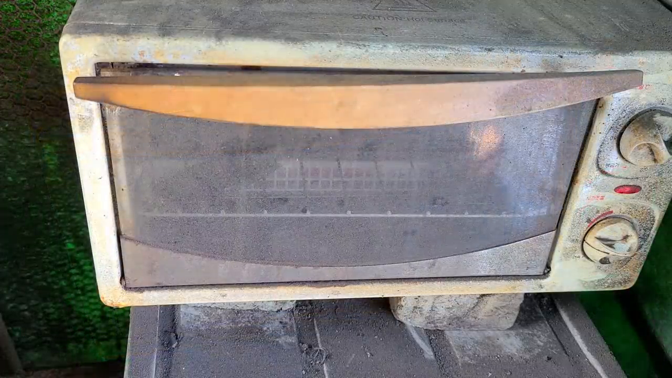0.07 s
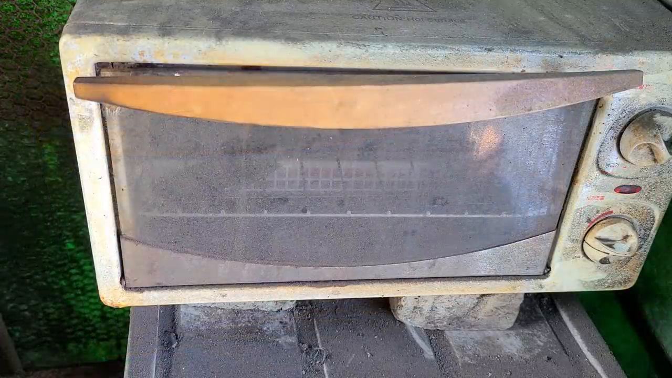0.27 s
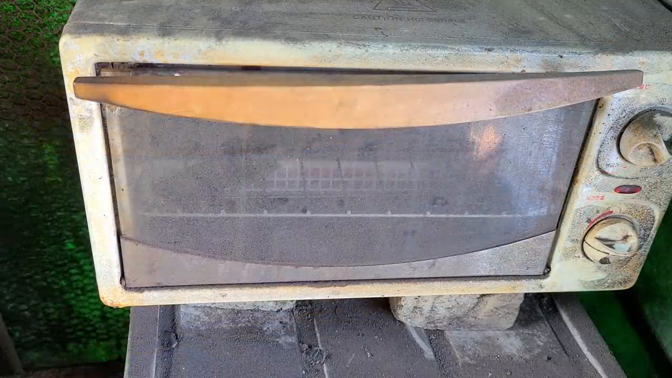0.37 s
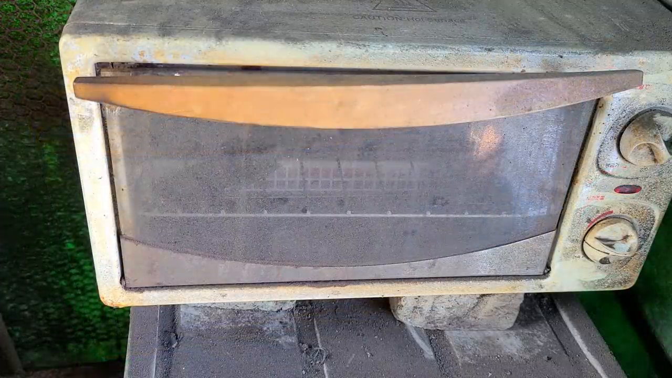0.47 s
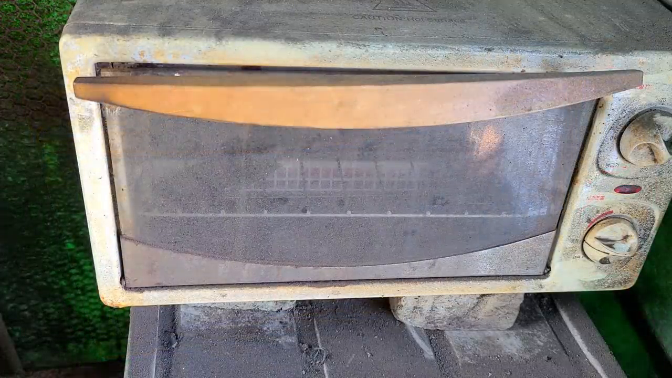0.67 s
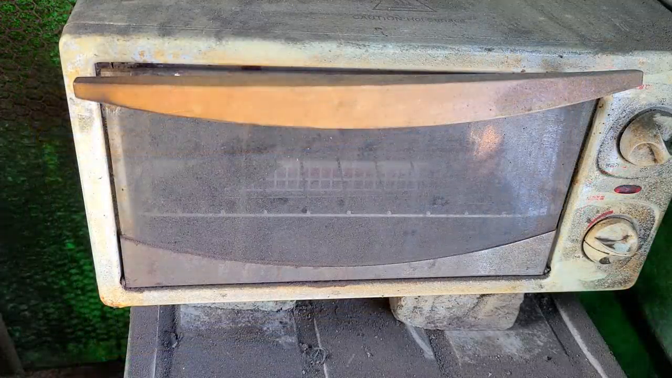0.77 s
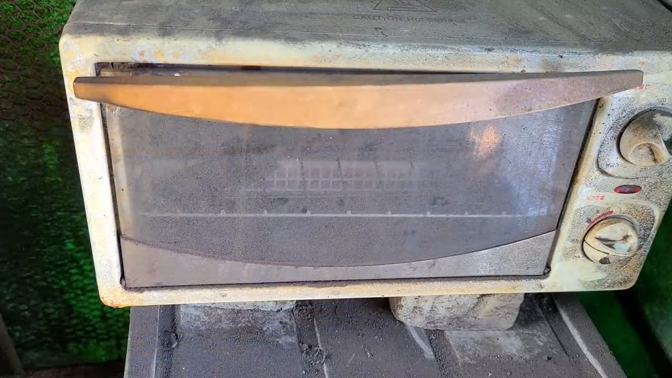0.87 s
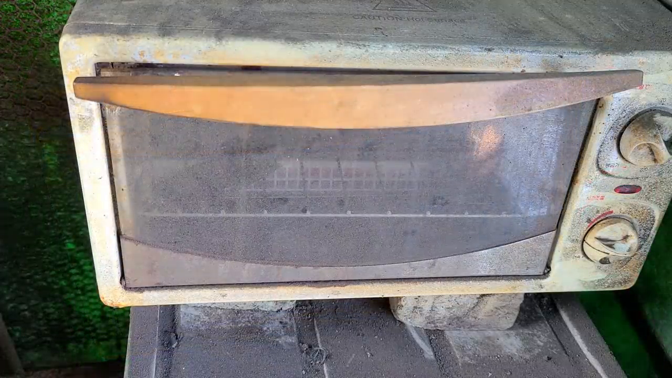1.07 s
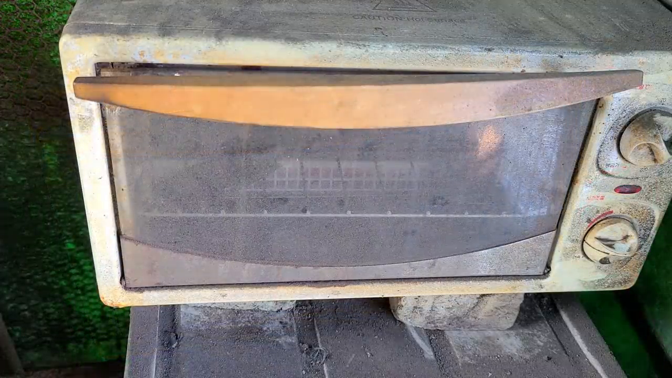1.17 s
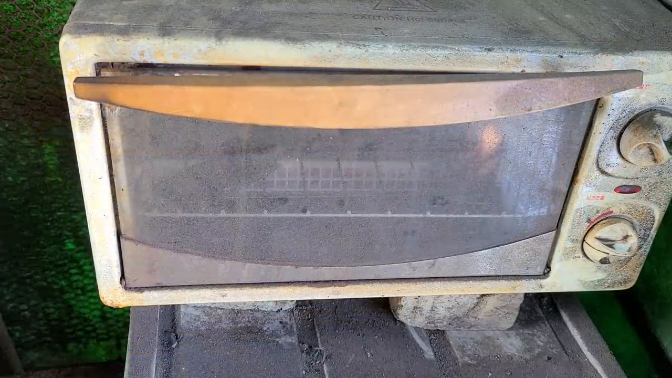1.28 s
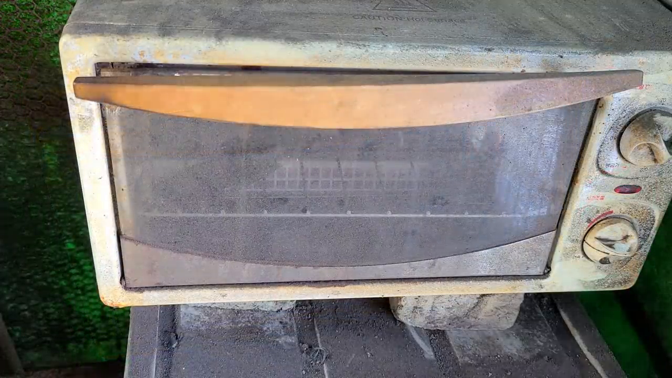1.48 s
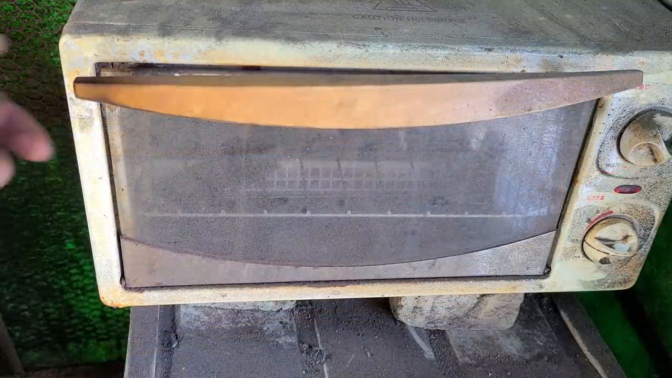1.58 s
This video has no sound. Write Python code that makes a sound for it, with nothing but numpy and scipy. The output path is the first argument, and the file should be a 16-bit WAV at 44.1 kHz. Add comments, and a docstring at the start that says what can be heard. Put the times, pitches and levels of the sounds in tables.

```python
"""In a workshop, the clockwork timer of a small toaster oven runs out and its hammer strikes the bell once.
The bell is four sine partials; the two lowest lie so close together that they beat fast.
The blow is made of short noise cracks, and it sets the sheet-metal case ringing and rattling.
An earlier knock dies away at the start, a few faint noise ticks follow, and the room rumbles quietly."""
import sys
import numpy as np
from scipy import signal
from scipy.io import wavfile

SR = 44100
rng = np.random.default_rng(int(sys.argv[2]) if len(sys.argv) > 2 else 0)


def pcm_store(signal):
    """Save signal as 16-bit PCM."""
    levels = np.round(np.clip(np.atleast_2d(signal), -1, 1) * 32767)
    wavfile.write(sys.argv[1], SR, levels.astype(np.int16).T)


N = 72765
TIME = np.arange(N) / SR  # seconds
STRIKE_S = 0.2003

# In all tables t60_s is the time to fall by 60 dB, and a positive left_right_db is louder on the left.
# Spectra (level_db_per_hz) give only the shape of a noise: its overall level is set separately.

# pitches of the bell's partials: pitch_hz
BELL_PARTIALS_HZ = [3425.7, 3527.9, 8181.3, 13788]
# how each partial rings, before its twin and the early ring are added: level_db, t60_s, left_right_db,
# left_lead_rad, twin_split_hz, twin_share (0-1), first_beat_dip_s (after the blow)
BELL_RINGING = [(-30.5, 4.03, -6, 0.059, 0, 0.05, 0), (-26, 3.17, -6, 0.94, 0, 0, 0),
                (-28, 1.344, 1, 1.08, 2.5, 0.9, 0.14), (-24, 0.56, -8.5, -0.8, 5, 0.6, 0.22)]
BELL_SWELL_S = 0.015  # the ring takes a moment to swell up
# extra early ring, relative to each partial; its fall comes on top of the partial's own
BELL_EARLY_DB, BELL_EARLY_T60_S = 2.5, 1
BELL_FLUTTER, FLUTTER_HZ = 0.06, 9  # spread as a share of the tone, and fastest rate
# late in the ring the second partial wavers; the depth is a share of the level, before it fades
WAVER_FROM_S, WAVER_RISE_S, WAVER_DIP_S = 0.83, 0.1, 1
WAVER_PERIOD_S, WAVER_DEPTH, WAVER_FADE_S = 0.205, 0.79, 0.71

# contacts: first a faint click as the catch lets go, then the hammer's: start_s, level_db (relative to
# CRACK_DB), left_right_db
HAMMER_CONTACTS = [(0.1957, -15.5, -5), (0.2013, 7, 2.5), (0.2045, -3.5, 3.5), (0.208, -5.5, -1.5)]
# spectrum of a crack: pitch_hz, level_db_per_hz
CRACK_SPECTRUM = [(200, -15), (1000, 2), (3000, -11.5), (7000, 4.5), (10000, -2.5), (14000, 3), (16000, 8)]
CRACK_DB, CRACK_T60_S = -13, 0.02
# short metallic sizzle around the top partial; widths are octaves to each side
SIZZLE_HZ, SIZZLE_WIDTH_OCT, SIZZLE_DB, SIZZLE_T60_S, SIZZLE_LEAN_DB = 13640, 0.083, -22, 0.18, -0.5
# the first instant of metal on metal, around the same pitch
SNAP_DB, SNAP_LEAN_DB, SNAP_WIDTH_OCT, SNAP_T60_S = -12, -2, 0.08, 0.011

# ringing panels of the case, each a cluster of close modes: pitch_hz, level_db (of the main mode), t60_s
CASE_MODES = [(160, -42.5, .6), (192.5, -33, .6), (250, -34, .5), (352.4, -46, 1), (423.4, -39.5, .6),
              (494, -39, 0.54), (589.5, -38.5, 1), (764.3, -31, 0.68), (821, -31, 0.77),
              (858.6, -36.5, 0.98), (1172, -34, 0.8), (1210, -37, 0.47), (1292, -41.5, .7),
              (1772, -31.5, 0.31)]
CASE_SWELL_S, CLUSTER_WIDTH, NEIGHBOUR_DB = 0.0024, 0.01611, -3  # width is a share of the pitch
CASE_EAR_SPREAD = 0.49  # scales the phase difference between the ears
# spectrum of the dense rattle of the case: pitch_hz, level_db_per_hz
RATTLE_SPECTRUM = [(60, -27), (120, -21), (190, -2), (400, -7), (800, -2), (1500, 0), (2600, -10),
                   (3500, -3), (6000, -9.5), (9500, -18), (12000, -15.5), (14000, -10), (16000, -26.5)]
# how long the rattle lasts: pitch_hz, t60_s
RATTLE_DECAY = [(150, 0.5), (700, 0.42), (1500, 0.24), (3000, 0.27), (6000, 0.16), (10000, 0.079),
                (14000, 0.23)]
RATTLE_DB, RATTLE_RISE_S = -15, 0.0032
# how alike left and right are: pitch_hz, likeness (read values are limited to -1..1)
LEFT_RIGHT_LIKENESS = [(60, 0.5), (150, 3.7), (300, 0.85), (640, .5), (1400, -0.1), (3000, -0.2),
                       (7000, -0.46), (15000, -0.5)]
# how the sound of the case leans to one side: pitch_hz, left_right_db
CASE_LEAN = [(200, 1), (700, -3), (1300, 1), (2400, -8), (4400, -3.5), (8000, -2.5), (15000, 0)]

# spectrum of the earlier knock: pitch_hz, level_db_per_hz
KNOCK_SPECTRUM = [(100, -12.5), (600, -8.5), (1500, 2.5), (2500, -8), (3500, 3), (5300, -1.5),
                  (7500, -11.5), (14000, -15)]
KNOCK_DB, KNOCK_T60_S = -40.5, 0.14
# resonances in the earlier knock: pitch_hz, level_db
KNOCK_RESONANCES = [(1510, -52.5), (3470, -49.5), (5180, -55)]
KNOCK_RING_WIDTH_OCT, KNOCK_RING_T60_S = 0.05, 0.2

# faint ticks and scuffs: start_s, level_db, pitch_hz (centre), half_width_octaves, t60_s
FAINT_TICKS = [(.793, -55, 610.3, 0.93, 0.16), (0.8324, -55, 1090, 1.7, 0.15),
               (0.9467, -50.5, 1270, 0.36, 0.12), (1.0186, -54.5, 1976, 0.22, 0.034),
               (1.1158, -63, 2100, 0.34, 0.096), (1.566, -61.5, 5000, 0.54, .15)]

# spectrum of the workshop's longer tail: pitch_hz, level_db_per_hz
TAIL_SPECTRUM = [(80, -19.5), (180, 5.5), (400, 8), (850, 7), (1500, 1), (3000, -26), (7000, -34),
                 (15000, -40)]
TAIL_DB, TAIL_T60_S = -37, 1.165
# spectrum of the room noise: pitch_hz, level_db_per_hz
ROOM_SPECTRUM = [(20, -8), (50, 3), (70, 1), (110, -17.5), (190, -11.5), (300, -24.5), (800, -23),
                 (1500, -31.5), (3000, -35), (6000, -42.5), (9000, -54.5), (13000, -39.5), (16000, -48.5)]
ROOM_DB = -51.5
# how alike the room noise is on left and right: pitch_hz, likeness
ROOM_LEFT_RIGHT_LIKENESS = [(60, 0.99), (200, .9), (600, 0.2), (2000, .2), (10000, .1)]
CUTOFF_HZ = 15800


def bell():
    """The struck bell rings in four partials; the upper two each beat slowly against a close twin."""
    age = TIME - STRIKE_S
    half_each_ear = np.array([[0.5], [-0.5]])
    early = from_db(BELL_EARLY_DB) * decay(STRIKE_S, BELL_EARLY_T60_S, BELL_SWELL_S)
    out = 0
    for k, (hz, ringing) in enumerate(zip(BELL_PARTIALS_HZ, BELL_RINGING)):
        db, t60, lean_db, lead, split, twin, dip_s = ringing
        # complex numbers carry level and phase together
        beat = 1 - twin * np.exp(2j * np.pi * split * (age - dip_s))
        flutter = 1 + BELL_FLUTTER * (drift(FLUTTER_HZ) + 1j * drift(FLUTTER_HZ))
        turning = np.exp(2j * np.pi * hz * age + 1j * lead * half_each_ear)
        tone = np.imag(beat * flutter * turning)
        level = decay(STRIKE_S, t60, BELL_SWELL_S) * (1 + early)
        if k == 1:
            level = level * waver()
        out = out + from_db(db) * pan(lean_db) * level * tone
    return out


def waver():
    """A slow swing of level that sets in late and fades."""
    age = np.maximum(TIME - WAVER_FROM_S, 0)
    depth = WAVER_DEPTH * np.minimum(age / WAVER_RISE_S, 1) * np.exp(-age / WAVER_FADE_S)
    return 1 - depth * np.cos(2 * np.pi * (TIME - WAVER_DIP_S) / WAVER_PERIOD_S)


def hammer():
    """The catch lets go, then the hammer hits and chatters: very short cracks, a snap and a bright sizzle."""
    cracks = 0
    for start, db, lean_db in HAMMER_CONTACTS:
        cracks = cracks + from_db(db) * pan(lean_db) * decay(start, CRACK_T60_S, rise=0.0002)
    cracks = from_db(CRACK_DB) * cracks * noise(CRACK_SPECTRUM, LEFT_RIGHT_LIKENESS)
    sizzle = burst(STRIKE_S, SIZZLE_HZ, SIZZLE_WIDTH_OCT, SIZZLE_T60_S, rise=0.0011)
    sizzle = from_db(SIZZLE_DB) * pan(SIZZLE_LEAN_DB) * sizzle
    snap = burst(STRIKE_S, SIZZLE_HZ, SNAP_WIDTH_OCT, SNAP_T60_S, rise=0.0006)
    snap = from_db(SNAP_DB) * pan(SNAP_LEAN_DB) * snap
    return cracks + sizzle + snap


def case():
    """The blow sets the panels ringing: clusters of modes over a dense rattle, each pitch dying at its own rate."""
    def rattle_envelope(hz):
        return pan(at_hz(CASE_LEAN, hz)) * decay(STRIKE_S, at_hz(RATTLE_DECAY, hz), RATTLE_RISE_S)

    out = from_db(RATTLE_DB) * noise(RATTLE_SPECTRUM, LEFT_RIGHT_LIKENESS, rattle_envelope)
    for hz, db, t60 in CASE_MODES:
        level = from_db(db) * pan(at_hz(CASE_LEAN, hz)) * decay(STRIKE_S, t60, CASE_SWELL_S)
        out = out + level * cluster(hz)
    return out


def cluster(hz, count=4):
    """One mode wavers against weaker neighbours close by; each reaches the two ears a little apart."""
    detune, turn, skew = rng.uniform(-1.005, 1, (3, count, 1, 1))
    neighbour = (np.arange(count) > 0)[:, None, None]  # the first is the main mode
    likeness = np.clip(at_hz(LEFT_RIGHT_LIKENESS, hz), -1, 1)
    apart = CASE_EAR_SPREAD * np.arccos(likeness) * skew * np.array([[1], [-1]])
    pitch_hz = hz * (1 + CLUSTER_WIDTH * detune * neighbour)
    phase = 2 * np.pi * pitch_hz * TIME + np.pi * turn + apart
    return np.sum(from_db(NEIGHBOUR_DB * neighbour) * np.sin(phase), axis=0)


def earlier_knock():
    """The end of a knock on the oven: dying noise with a little ring in it."""
    rings = 0
    for hz, db in KNOCK_RESONANCES:
        rings = rings + from_db(db) * burst(0, hz, KNOCK_RING_WIDTH_OCT, KNOCK_RING_T60_S, rise=0.0013)
    thud = decay(0, KNOCK_T60_S, rise=0.00095) * noise(KNOCK_SPECTRUM, LEFT_RIGHT_LIKENESS)
    return rings + from_db(KNOCK_DB) * thud


def ticks():
    """Faint ticks, each a short burst of noise around its own pitch."""
    out = 0
    for start, db, hz, width_oct, t60 in FAINT_TICKS:
        out = out + from_db(db) * burst(start, hz, width_oct, t60, rise=0.0004)
    return out


def workshop():
    """The room's steady rumble, and the blow's tail as slowly dying noise."""
    tail = decay(STRIKE_S, TAIL_T60_S, rise=0.02) * noise(TAIL_SPECTRUM, LEFT_RIGHT_LIKENESS)
    rumble = noise(ROOM_SPECTRUM, ROOM_LEFT_RIGHT_LIKENESS)
    return from_db(ROOM_DB) * rumble + from_db(TAIL_DB) * tail


def from_db(db):
    """Decibels to gain."""
    return 10 ** (np.asarray(db) / 20)


def at_hz(points, hz):
    """Read a table between its points, on a log-frequency axis."""
    table_hz, values = np.transpose(points)
    return np.interp(np.log(hz), np.log(table_hz), values)


def pan(db):
    """Left and right gains for a level difference."""
    return from_db(np.array([[db], [-db]]) / 2)


def decay(start, t60, rise):
    """Rise from the start, then die away by 60 dB per t60."""
    age = np.maximum(TIME - start, 0)
    return (1 - np.exp(-age / rise)) * from_db(-60 * age / t60)


def noise(spectrum, likeness, envelope=lambda hz: 1):
    """Third-octave bands of stereo noise, rms 1 in all, each then under its own envelope."""
    edges = np.geomspace(18, 17000, 31)
    centres = np.sqrt(edges[1:] * edges[:-1])
    gains = from_db(at_hz(spectrum, centres))
    gains = gains / np.sqrt(np.sum(gains ** 2 * np.diff(edges)) * 2 / SR)
    white = rng.standard_normal((2, 2, N + SR // 4))
    out = 0
    for k, hz in enumerate(centres):
        band = signal.butter(2, edges[k:k + 2], "band", fs=SR, output="sos")
        # neighbouring bands use different noise; the filter's start is cut off
        mid, side = signal.sosfilt(band, white[k % 2])[:, -N:]
        alike = np.clip(at_hz(likeness, hz), -1, 1)
        shared = np.sqrt((1 + alike) / 2) * mid
        opposed = np.sqrt((1 - alike) / 2) * side * [[1], [-1]]
        out = out + gains[k] * envelope(hz) * (shared + opposed)
    return out


def burst(start, hz, width_oct, t60, rise):
    """A dying burst of stereo noise around one pitch."""
    edges = np.minimum(hz * 2 ** (width_oct * np.array([-1, 1])), SR / 2 - 1)
    band = signal.butter(2, edges, "band", fs=SR, output="sos")
    hiss = signal.sosfilt(band, rng.standard_normal((2, N + SR // 4)))[:, -N:]
    return decay(start, t60, rise) * hiss / hiss.std()


def drift(hz):
    """Slow random wandering, separate for each ear; spread 1."""
    low_pass = signal.butter(2, hz, fs=SR, output="sos")
    slow = signal.sosfilt(low_pass, rng.standard_normal((2, N + SR // 2)))[:, -N:]
    return slow / slow.std()


def scene():
    """All sources together, left and right."""
    return bell() + hammer() + case() + earlier_knock() + ticks() + workshop()


def record(dry):
    """A steep low-pass filter cuts off the top."""
    low_pass = signal.ellip(10, 0.1, 80, CUTOFF_HZ, fs=SR, output="sos")  # 0.1 dB ripple, 80 dB cut
    return signal.sosfilt(low_pass, dry)


dry = scene()
out = record(dry)
pcm_store(out)
```